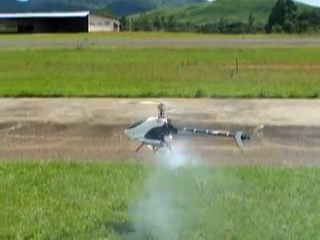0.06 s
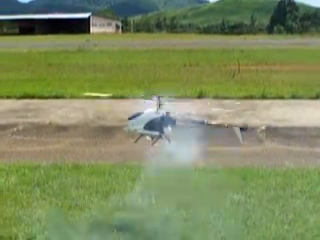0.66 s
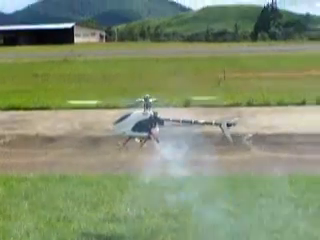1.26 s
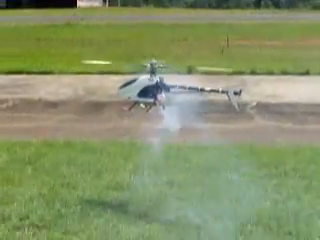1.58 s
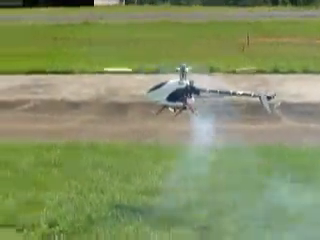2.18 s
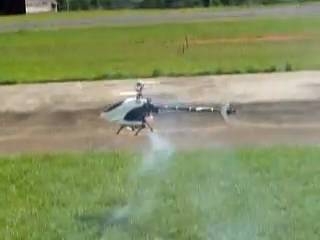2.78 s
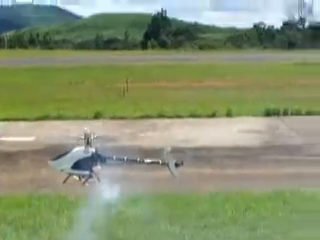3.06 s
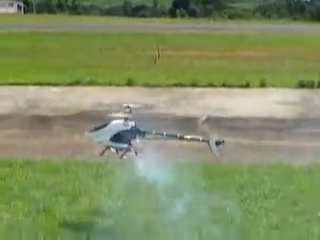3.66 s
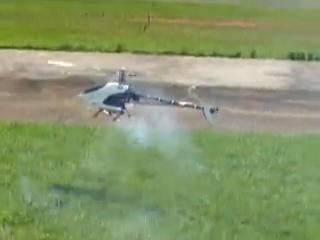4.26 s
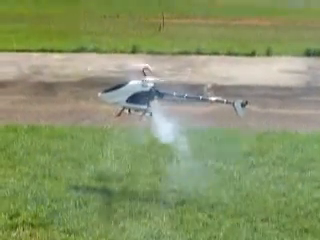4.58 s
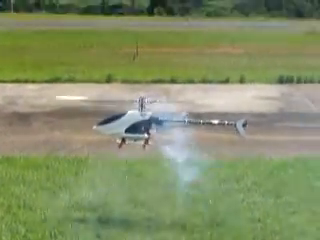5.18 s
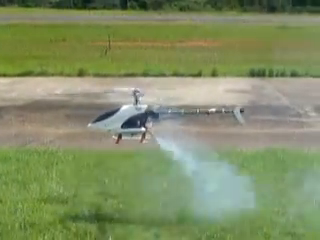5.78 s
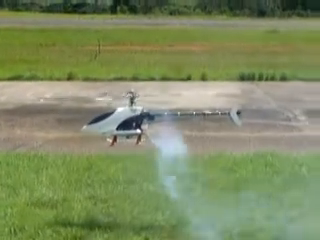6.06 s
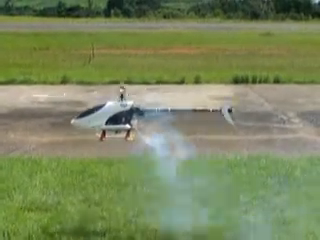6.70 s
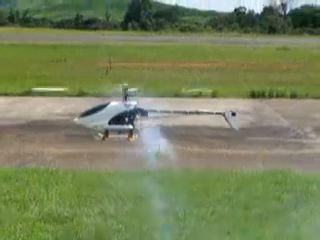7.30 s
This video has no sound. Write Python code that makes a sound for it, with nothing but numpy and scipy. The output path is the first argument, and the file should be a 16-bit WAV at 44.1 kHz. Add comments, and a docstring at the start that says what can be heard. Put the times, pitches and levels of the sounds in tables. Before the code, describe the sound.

The steady, raspy buzz of a small hovering helicopter's engine, with rotor swish, a thin high whine and faint wind puffs.

```python
"""A radio-controlled helicopter hovers over an airfield, a few metres from a single microphone.
Its two-stroke engine buzzes and rasps through the silencer; geared to it, the rotors thrum and swish
and the drive train whines. The colour shifts as the craft turns and as its height changes the echo
off the ground. Light puffs of wind touch the microphone."""
import sys
import numpy as np
from scipy import signal
from scipy.fft import rfft, irfft, next_fast_len
from scipy.io import wavfile
from scipy.ndimage import map_coordinates

SR = 44100
rng = np.random.default_rng(int(sys.argv[2]) if len(sys.argv) > 2 else 0)


def to_wav(s):
    """Save 16-bit WAV."""
    ch = np.atleast_2d(s).T  # columns
    pcm = np.round(np.clip(ch, -1, 1) * 32767)  # PCM
    wavfile.write(sys.argv[1], SR, pcm.astype(np.int16))


N = 332073

MAIN_TURN = .1173  # main rotor turns per crank turn
# Crankshaft speed. Each row: time in seconds, firings per second.
SPEED = [(0.0, 218.2), (1.2, 218.4), (2.4, 218.3), (4.15, 217.8), (4.6, 219.0), (5.0, 217.4), (5.9, 216.2),
         (6.6, 216.6), (7.0, 216.6), (7.53, 217.3)]
# The ground echo reaches the microphone later as the craft climbs. Each row: time, lag, both in seconds.
GROUND_LAG = [(0.0, 0.001076), (0.24, 0.001061), (0.94, 0.0012), (1.22, 0.001293), (2.36, 0.0014),
              (2.91, 0.001254), (3.66, 0.001234), (3.79, 0.00126), (4.69, 0.001274), (4.97, 0.001227),
              (5.74, 0.001205), (6.86, 0.001339), (7.22, 0.001544), (7.53, 0.001553)]


def amp(db):
    """Decibels to gain."""
    return 10 ** (np.asarray(db) / 20)


def unit(x):
    """x scaled to rms 1."""
    return x / np.sqrt(np.mean(np.abs(x) ** 2) + 1e-20)


def curves(rows):
    """One value per sample for each column after the time."""
    times, *columns = np.transpose(rows)
    return [np.interp(np.arange(N) / SR, times, column) for column in columns]


def wobble(rate):
    """A smooth random curve, rate knots a second."""
    return map_coordinates(rng.standard_normal(int(N * rate / SR) + 4), [np.arange(N) * rate / SR])


def filtered(x, response):
    """x through a response given as a function of Hz."""
    size = next_fast_len(N + 8192)
    return irfft(rfft(x, size) * response(np.fft.rfftfreq(size, 1 / SR)), size)[:N]


def coloured(x, points):
    """x shaped by (Hz, dB) points, at rms 1."""
    points_hz, db = np.transpose(points)
    return unit(filtered(x, lambda hz: amp(np.interp(np.log(hz + 1), np.log(points_hz), db))))


def noise():
    """White noise."""
    return rng.standard_normal(N)


def flutter(width_hz, clear_hz=.01):
    """Complex unsteadiness that gives a tone skirts of this half width, thinned within clear_hz of it."""
    step = 20  # samples between drawn points
    hz = np.fft.fftfreq(N // step + 2, step / SR)
    real, imag = rng.standard_normal((2, len(hz)))
    skirts = np.abs(hz) / np.hypot(hz, clear_hz) / (1 + (hz / width_hz) ** 2)
    coarse = np.fft.ifft((real + 1j * imag) * skirts)
    return unit(np.interp(np.arange(N) / step, np.arange(len(hz)), coarse))


def tone(phase, unsteady):
    """A tone of rms 1 whose size and phase are shaken."""
    return unit(np.real(np.exp(1j * phase) * (1 + unsteady)))


def gate(phase, depth, sharp):
    """One swell per turn of the phase."""
    return unit(1 + depth * np.exp(sharp * (np.cos(phase) - 1)))


def resonance(hz, centre_hz, width_hz):
    """One mode's response, 1 at its centre."""
    return 1j * hz * width_hz / (centre_hz ** 2 - hz ** 2 + 1j * hz * width_hz)


def turned(start_s=2.5, length_s=0.98):
    """How far the craft has swung round, 0 to 1; it aims its exhaust differently from then on."""
    return np.clip((np.arange(N) / SR - start_s) / length_s, 0, 1)


def exhaust_buzz(crank, effort_db):
    """Firing pulses, roughened by uneven burns; each partial swells and fades against its ground echo."""
    # The pulse's partials. Each row: crank order, level in dB, dB gained by the turn, share of
    # ground echo, phase of that echo in radians.
    partials = [(1.0, -29.0, -3, 0.55, -1.15), (2.0, -51.5, -3.5, 0.65, -1.9), (3.0, -34.5, -5, 0.53, -0.5),
                (4.0, -41.5, 3, 0.58, -1.18), (5.0, -36.5, -6, 0.27, -1.35), (6.0, -32.5, 0.4, 1, -0.54),
                (7.0, -25.5, -0.4, 0.42, -0.5), (8.0, -49.5, 12.5, 0.82, -1.5),
                (9.0, -37, -8.5, 0.98, -1.5), (10.0, -45, -2.0, 0.3, -8.5), (11.0, -41.5, 0, 0.12, -8.5),
                (12.0, -31.5, 4.5, 0.56, -0.35), (13.0, -38, -2.5, 0.35, 1.7), (14.0, -38.5, -2, 0.75, -3),
                (15.0, -37, 2, 0.2, -2), (16.0, -44.0, 12.1, 0.55, 0.53), (17.0, -50.5, 5.6, 0.33, -6),
                (18.0, -47.5, -2, 0.64, 3.7), (19.0, -37.5, -11, 0.05, 3.5), (20.0, -49.5, 3, 0.29, 6.5)]
    # A passing change of colour. Each row: time in seconds, depth from 0 to 1.
    swell_depth = [(3, 0), (3.8, .7), (4.6, 1), (5.5, 0)]
    # The firing tone sinks and the fourth partial swells. Each entry: crank order, dB at full depth.
    swell_db = {1: -3.5, 4: 5.5}
    scatter_rad = 0.048  # how early or late a burn comes
    firing = crank + scatter_rad * unit(np.real(flutter(width_hz=50, clear_hz=22)))
    lag_s, = curves(GROUND_LAG)
    lag_rad = 2 * np.pi * SPEED[0][1] * lag_s
    turn = turned()
    swell, = curves(swell_depth)
    buzz = np.zeros(N)
    for order, db, turn_db, echo, echo_phase in partials:
        comb = np.abs(1 + echo * np.exp(1j * (echo_phase - order * lag_rad)))
        smear = .16 * order ** 2  # the silencer smears each pulse into a short chirp
        partial = tone(order * firing - smear, .06 * flutter(width_hz=110, clear_hz=60))
        drift_db = (.25 + .05 * order) * wobble(2.54) + swell_db.get(order, 0) * swell
        buzz += amp(db + turn_db * turn + drift_db) * comb * partial
    return amp(0.47 * effort_db) * buzz


def exhaust_rasp(crank, effort_db):
    """Each firing lets out a puff of turbulent gas, which also rings the silencer and the casing."""
    # Colours of the gas's rasp and its hiss. Each row: frequency in Hz, relative level in dB.
    rasp_colour = [(600, -18.5), (1150, -13.5), (1350, -4), (1800, -3.5), (2100, -3), (2350, -3),
                   (2600, 2.5), (2900, -3), (3500, 2), (4250, -1.5), (4550, -0.5), (5250, -1.5),
                   (5700, -6.5), (6500, -54)]
    hiss_colour = [(3500, -34), (5500, -10.5), (6000, -1.5), (6400, 0), (6800, -2), (7250, -1.5),
                   (7650, -4), (8000, -9.5), (8650, -9), (8950, -11.5), (9200, -18), (9900, -28),
                   (10400, -41), (11300, -52.5)]
    # The casing's resonances. Each row: centre in Hz, width in Hz, strength in dB.
    casing_modes = [(3490, 64, -8.5), (3760, 100, -10), (4204, 146, 2.5), (5170, 210, -10.5)]
    silencer = lambda hz: resonance(hz, centre_hz=1437, width_hz=114) ** 2
    casing = lambda hz: 1 + sum(amp(db) * np.abs(resonance(hz, centre, width)) ** 2
                                for centre, width, db in casing_modes)
    ring = unit(filtered(noise() * gate(crank, depth=6.6, sharp=5.3), silencer))
    # gas rushes on both strokes
    ports = gate(crank + 1.3, depth=0.2, sharp=4.4) * gate(2 * crank + 3, depth=0.36, sharp=1.5)
    rasp = unit(filtered(coloured(noise() * ports, rasp_colour), casing))
    hiss = coloured(noise() * gate(crank + 0.61, depth=0.65, sharp=1.5), hiss_colour)
    hollow_hz, hollow_width_hz, hollow_db = 7960, 270, -5.5
    hollow = filtered(hiss, lambda hz: amp(hollow_db * np.exp(-((hz - hollow_hz) / hollow_width_hz) ** 2)))
    hiss += turned() * (hollow - hiss)  # one band goes hollow with the turn
    flicker_db = 0.65 * wobble(60) + 0.76 * wobble(3.6)
    ring *= amp(-33.5 + 0.87 * effort_db)
    rasp *= amp(-21 + .1 * effort_db + 0.1 * turned())
    hiss *= amp(-33 + .25 * effort_db + flicker_db)
    return ring + over_ground(rasp + hiss)


def over_ground(x, share=0.18, phase_rad=-0.27):
    """A weak echo off the ground combs the treble at the microphone and shifts as the craft moves."""
    lag_s, = curves(GROUND_LAG)
    samples = np.arange(N)
    echo = np.real(signal.hilbert(x) * np.exp(1j * phase_rad))
    return x + share * np.interp(samples - lag_s * SR, samples, echo)


def rotors(crank, effort_db):
    """Blades and gears hum at fixed ratios of the crank; the air swishes as each of two blades passes."""
    # Main blades, tail blades and gear meshes. Each row: crank order, relative level in dB,
    # dB gained by the turn.
    rotor_lines = [(.2346, -50.5, -.5), (.4692, -54, 0), (1.096, -58, 0), (1.4692, -60, 0),
                   (2.096, -51, -1), (3.12, -46, -2), (10.915, -46, 5.5), (13.15, -44, 0), (19.485, -39, 0)]
    # Colour of the swish. Each row: frequency in Hz, relative level in dB.
    swish_colour = [(60, -24), (130, -12), (280, -4.5), (360, -7.5), (430, -8.5), (510, 3), (600, 1),
                    (750, 4), (830, -5.5), (1100, -6), (1500, -26), (3000, -59)]
    blade = 2 * MAIN_TURN * crank
    turn = turned()
    thrum = np.zeros(N)
    for order, db, turn_db in rotor_lines:
        gain = amp(db + turn_db * turn + 1.2 * wobble(3.0))
        thrum += gain * tone(order * crank, 0.09 * order * flutter(width_hz=8))
    hum_db = -53.5 + 1.83 * np.arange(N) / SR  # a fuzzy hum of the blades grows steadily
    hum = amp(hum_db) * tone(10 * blade, 1.4 * flutter(width_hz=11))
    swish = coloured(noise() * gate(blade, depth=0.49, sharp=3.8), swish_colour)
    swish_db = -35.5 + 0.39 * effort_db - 0.5 * turn
    return amp(-0.5) * thrum + hum + amp(swish_db) * swish + blade_warble(crank, blade)


def blade_warble(crank, blade):
    """Each passing blade scatters the firing tone, bending its phase more than its size."""
    chop = np.exp(.95j * np.sin(blade)) * (1 + .42 * np.cos(blade))
    return amp(-40.5) * unit(np.real(np.exp(1j * crank) * (chop - chop.mean())))


def drive_whine(crank):
    """A high whine, probably of a bearing, whose load throbs with the main rotor and with the piston."""
    # The whine's rise and fall. Each row: time in seconds, relative level in dB.
    whine_level = [(0.0, -23.5), (0.35, -23), (0.7, -27), (1.1, -24.5), (1.7, -24.5), (2.05, -26),
                   (2.45, -24), (3.0, -25.5), (3.5, -23.5), (4.55, -22.5), (4.85, -30), (5.85, -32),
                   (6.25, -24.5), (6.68, -29.5), (6.95, -25), (7.2, -26), (7.36, -29.6), (7.53, -24.2)]
    # Its thin clear core sags for a while, then recovers. Each row: time in seconds, pitch in Hz.
    core_pitch = [(0, 4870), (4.55, 4868), (4.9, 4745), (7.2, 4726), (7.53, 4870)]
    # Fuzzy overtones of the drive train. Each row: crank order, level in dB.
    overtones = [(16.8, -38), (25.7, -47.5), (28.9, -50), (32.55, -43.5), (33.5, -48.5), (34.6, -49),
                 (39, -56), (41.1, -60)]
    whine_db, = curves(whine_level)
    core_hz, = curves(core_pitch)
    rotor = MAIN_TURN * crank
    throb = 1 + .22 * np.cos(rotor) + .23 * np.cos(2 * rotor + 1) + .34 * np.cos(4 * rotor)
    piston = 1 + .3 * np.cos(2 * crank)
    tremble = .7 * unit(np.real(flutter(width_hz=70, clear_hz=10)))
    core_phase = 2 * np.pi * np.cumsum(core_hz + 3 * wobble(12)) / SR
    core = tone(core_phase + tremble, 0.032 * flutter(width_hz=5.2))
    halo_hz = 4837 + .35 * (core_hz - core_hz.mean())  # a rough halo partly follows the core
    halo = unit(np.real(np.exp(2j * np.pi * np.cumsum(halo_hz) / SR) * flutter(width_hz=140)))
    halo_share = 0.74 + 0.0027 * (core_hz.max() - core_hz)  # rougher as it sags
    whine = amp(whine_db + 1.7) * unit((core + halo_share * halo) * throb * piston)
    singing = sum(amp(db + 0.83 * wobble(3.1)) * tone(order * crank, 1.4 * flutter(width_hz=45))
                  for order, db in overtones)
    return whine + singing


def wind(lull_s=3.2, puff_width_s=.045):
    """Lumpy air on the microphone: a light breeze that drops to a lull, and a few stronger puffs."""
    # Colour of the buffeting. Each row: frequency in Hz, relative level in dB.
    buffet_colour = [(8, -8.5), (25, -9), (60, 4), (100, -2), (160, -9), (400, -47.5)]
    # The puffs. Each row: time of the peak in seconds, level in dB.
    puff_peaks = [(.17, -37), (.63, -43), (2.39, -46), (2.96, -41)]
    t = np.arange(N) / SR
    breeze = amp(np.where(t < lull_s, -48, -53))
    puffs = sum(amp(db) * np.exp(-((t - peak_s) / puff_width_s) ** 2) for peak_s, db in puff_peaks)
    buffet = unit(coloured(noise(), buffet_colour) * amp(2.5 * wobble(19)))
    return (breeze + puffs) * buffet


def scene():
    """The craft a few metres off in a breeze, driven by its slightly trembling crank and its effort."""
    # How hard the engine works, heard most in the silencer's ring. Each row: time in seconds,
    # relative level in dB.
    effort = [(0.0, -23.5), (0.85, -23), (1.6, -25.5), (2.35, -28), (2.95, -23.5), (3.6, -27.5),
              (4.45, -27.5), (4.8, -24.7), (5.8, -26.5), (6.7, -23.5), (7.2, -31), (7.53, -22.5)]
    speed_hz, = curves(SPEED)
    crank = 2 * np.pi * np.cumsum(speed_hz + 0.16 * wobble(35) + .15 * wobble(4)) / SR
    effort_db, = curves(effort)
    effort_db -= effort_db.mean()
    engine = exhaust_buzz(crank, effort_db) + exhaust_rasp(crank, effort_db)
    mono = engine + rotors(crank, effort_db) + drive_whine(crank) + wind()
    return np.array([mono, mono])


def record(dry):
    """The microphone's chain passes nothing above its band limit."""
    top_hz = 11200
    return np.array([filtered(channel, lambda hz: hz < top_hz) for channel in dry])


dry = scene()
out = record(dry)
to_wav(out)
```